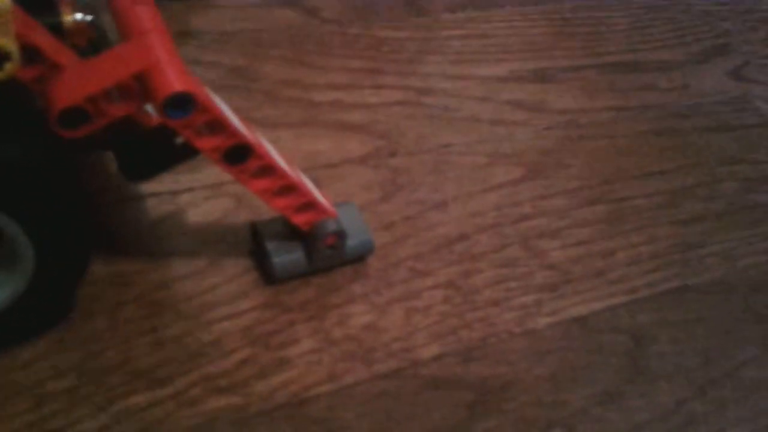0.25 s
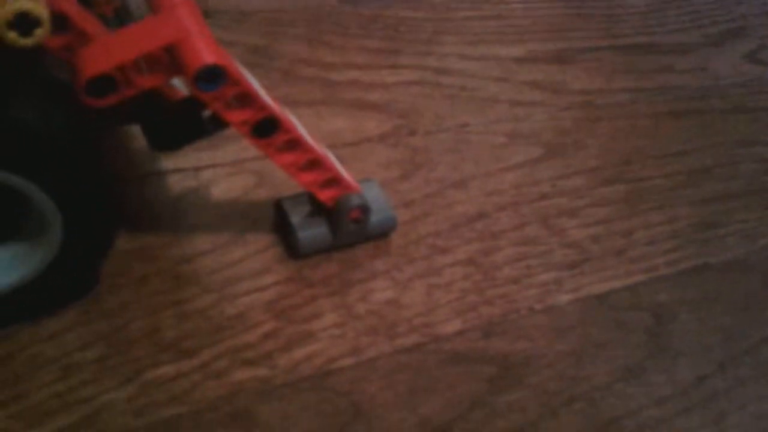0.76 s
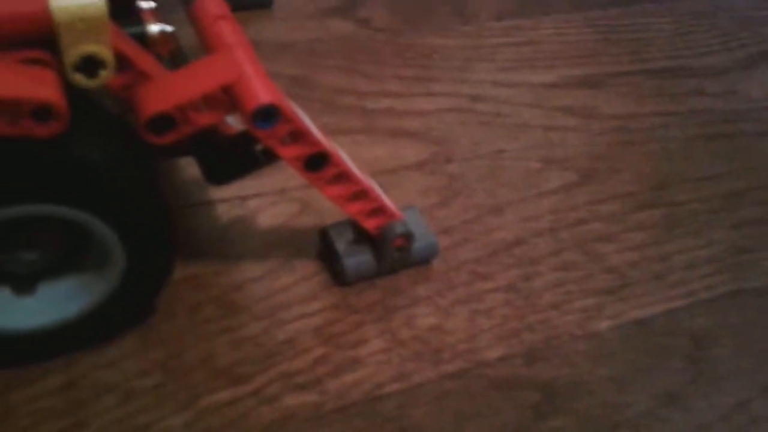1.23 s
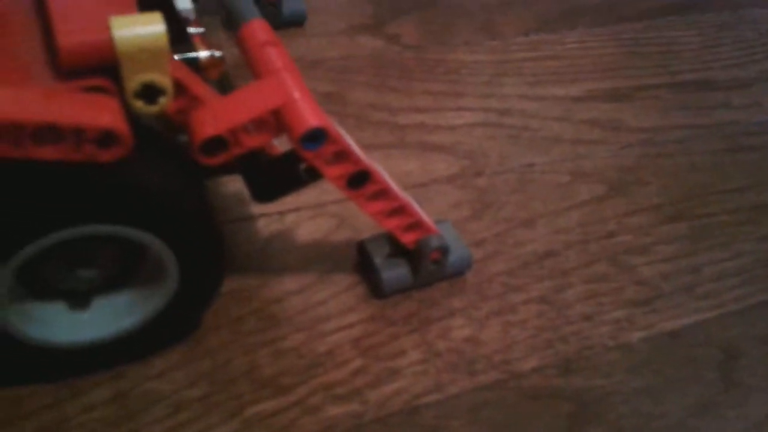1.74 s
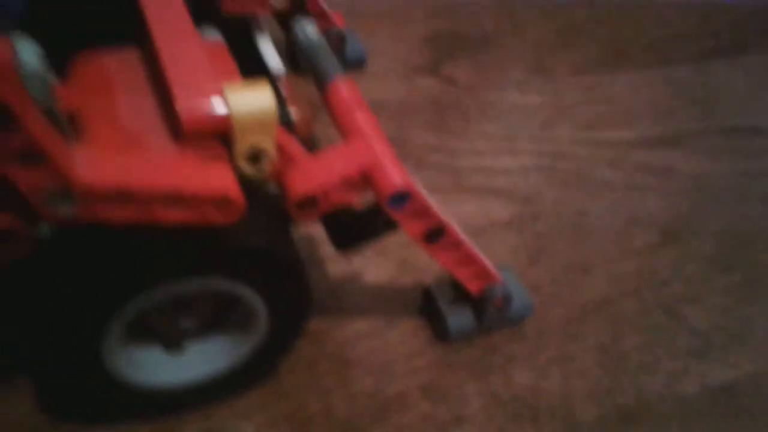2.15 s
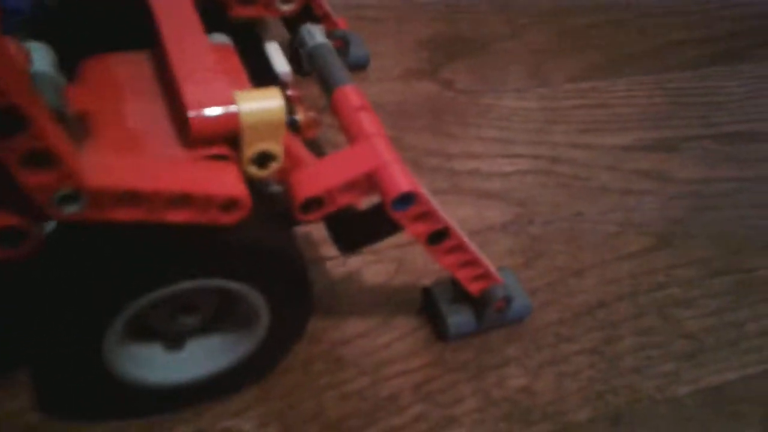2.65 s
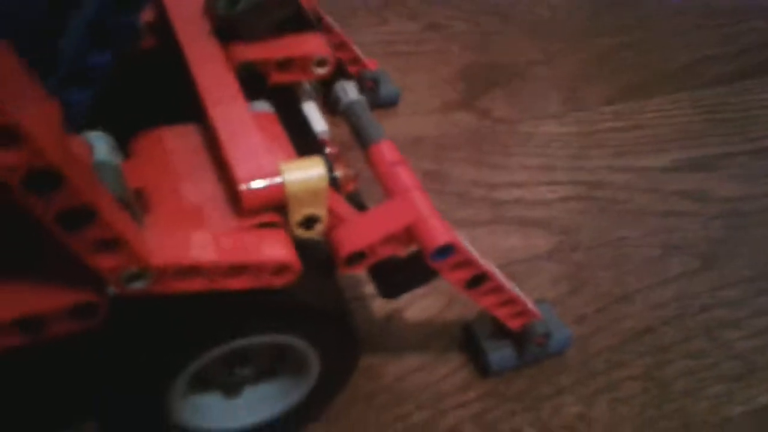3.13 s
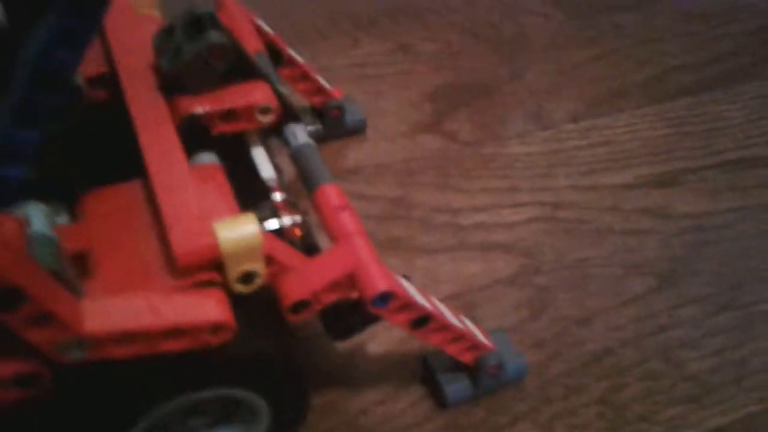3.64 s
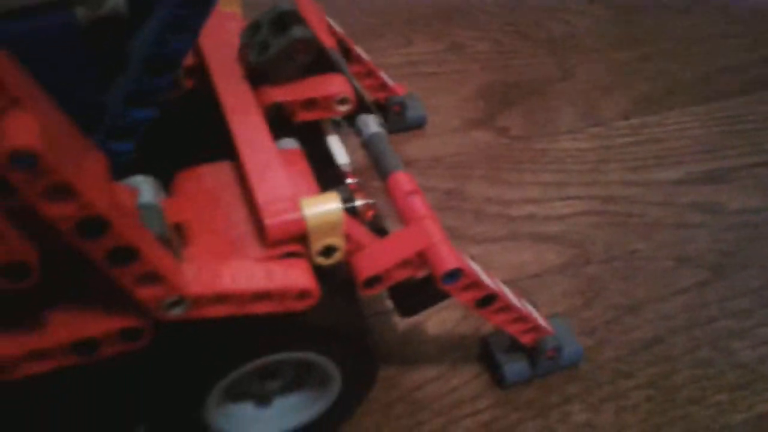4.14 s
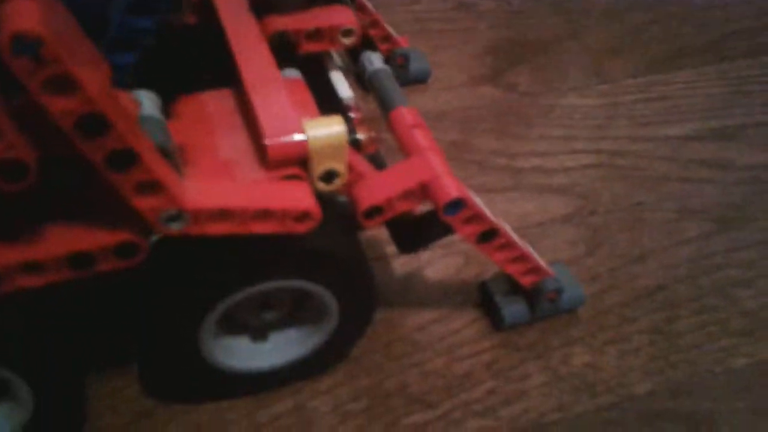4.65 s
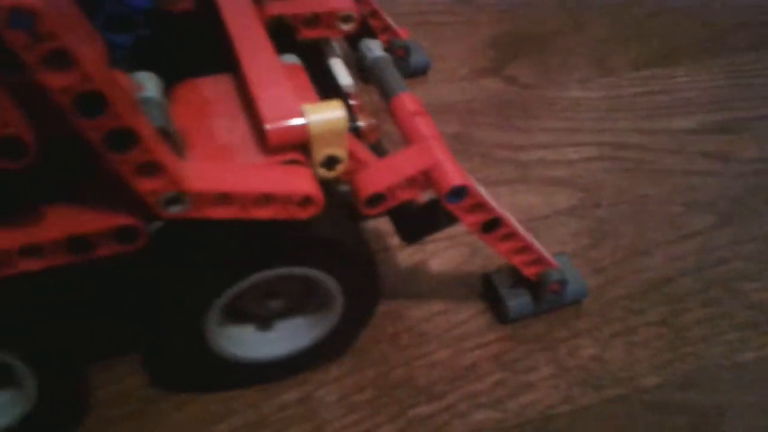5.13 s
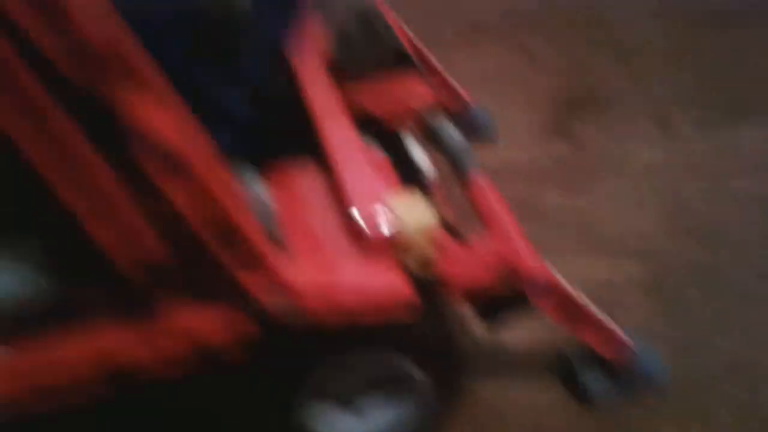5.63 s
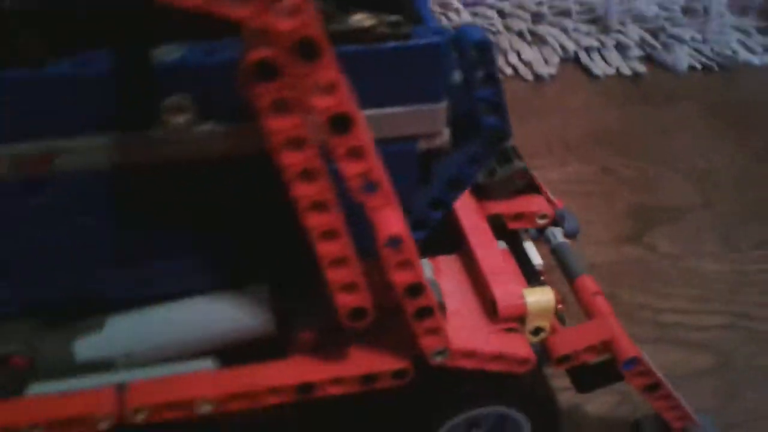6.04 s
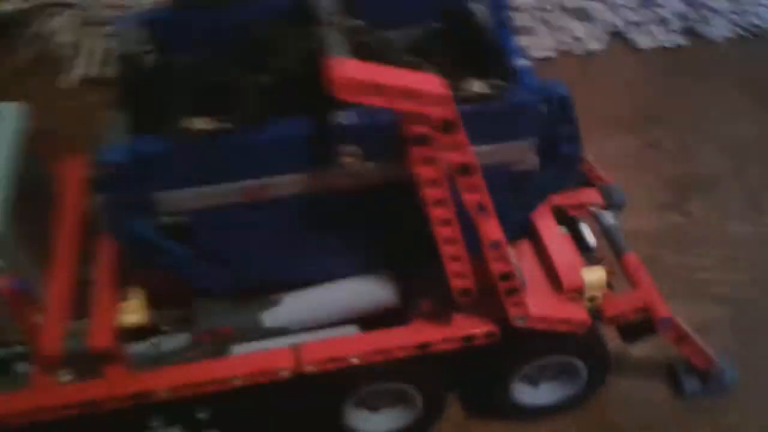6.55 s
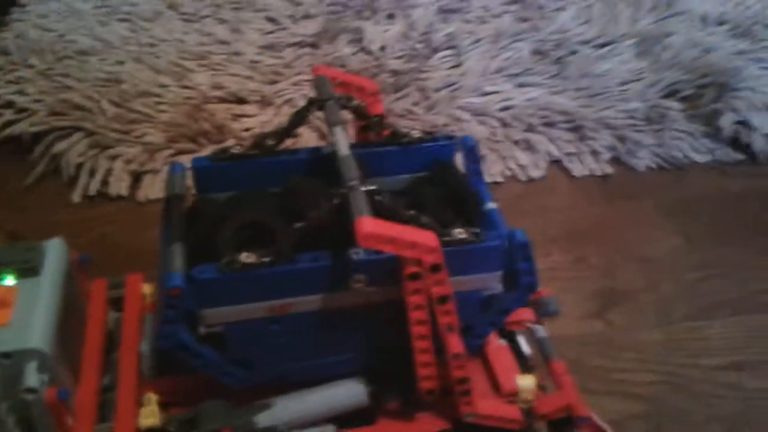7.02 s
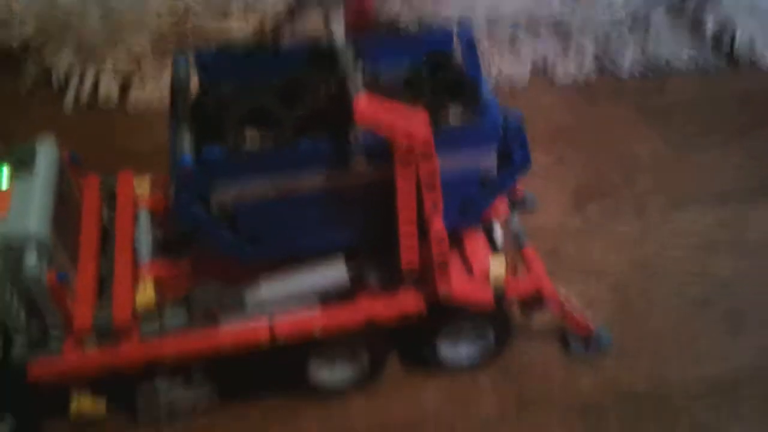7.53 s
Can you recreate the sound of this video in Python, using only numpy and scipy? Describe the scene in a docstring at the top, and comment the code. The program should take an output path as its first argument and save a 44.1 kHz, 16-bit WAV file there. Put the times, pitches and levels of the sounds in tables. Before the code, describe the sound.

Close grinding buzz of a toy truck's motor stops, plastic levers snap in near silence, then the gears whir again and gradually strain.

```python
"""Geared motor in a toy truck.

A small electric motor in a plastic truck on a wooden floor, heard close in mono. It runs and coasts down,
levers click and a part is nudged, then it runs in reverse and slows under load as the camera backs off.
Gears are pulsed noise and knocks coloured by the housing; shaft orders, pinion mesh and whine are sines
locked to shaft angle; clicks are noise bursts through resonances; handling and background are shaped noise.
"""
import sys
import numpy as np
from scipy import signal
from scipy.fft import rfft, irfft, next_fast_len
from scipy.io import wavfile
from scipy.ndimage import uniform_filter1d, map_coordinates

SR = 44100
rng = np.random.default_rng(int(sys.argv[2]) if len(sys.argv) > 2 else 0)


def persist_wave(psi):
    """Save psi, clipped to +-1, as 16-bit WAV."""
    counts = np.round(np.clip(psi, -1, 1) * 32767).astype(np.int16)
    wavfile.write(sys.argv[1], SR, np.atleast_2d(counts).T)


N = 343098
TIME_S = np.arange(N) / SR
TOP_HZ = 15730
PINION_TEETH = 9
STOP_S, COAST_S, START_S, SPIN_UP_S = 1.48, .22, 3.7, .3

# Shaft, forward then reverse under load: start_s, speed_hz (before coast and spin-up), mesh_tone_db (before trim)
SHAFT = [(0, 150, -73), (.62, 150.1, -72), (.75, 147.6, -67), (.98, 147, -68), (1.06, 144, -65),
         (1.14, 149, -71), (1.22, 149, -72), (1.28, 146, -73), (1.54, 146.5, -75), (3.96, 149, -63),
         (4.2, 152.1, -61), (4.45, 152.1, -61), (4.55, 151.1, -58), (4.72, 151.5, -59), (5.05, 149.1, -58),
         (5.2, 148.8, -57), (5.42, 146.7, -55), (5.5, 145.2, -55), (5.68, 144.3, -55), (5.88, 141.7, -57),
         (6.05, 138.8, -59), (6.2, 138.7, -61), (6.33, 135.5, -62), (6.59, 132.3, -70), (6.72, 132.7, -70),
         (6.88, 131.3, -75), (7.13, 133.8, -74), (7.37, 137.7, -73), (7.78, 140.2, -70)]
# View heard, 0 forward, 1 reverse near, 2 backing off, 3 reverse far: start_s, view_0_to_3
VIEW = [(3, 0), (3.8, 1), (5.5, 1), (6.0, 2), (6.5, 2), (6.95, 3)]
# Gear noise, one list forward, one reverse: start_s, level_db (before treble and bass lift)
GEAR_LEVEL = [
    [(0, -38.5), (.4, -36), (.7, -37.3), (1.0, -35.5), (1.3, -38), (1.45, -35), (1.52, -39), (1.59, -46),
     (1.62, -52), (1.67, -75), (1.75, -95)],
    [(3.76, -59), (3.78, -49), (3.83, -40), (3.88, -40.5), (3.93, -34), (3.97, -34.5), (4.02, -39),
     (4.2, -41.5), (4.5, -38), (5.1, -37), (5.8, -35.3), (6.3, -36.6), (7.05, -38), (7.78, -41.5)],
]
# Housing colour, one list per view: freq_hz, relative_db_per_hz
HOUSING = [
    [(100, -14), (500, -12), (1400, -12), (1900, -8.5), (3800, 4.5), (4600, 5.5), (5800, 3), (7400, -9.5),
     (8200, -12), (10500, -12.5), (11300, -8), (13000, -9.5), (15700, -14.5)],
    [(100, -21), (500, -18), (1400, -16), (2000, -6.5), (3800, -4), (5500, -6.5), (7000, -9.5),
     (9000, -12.5), (9700, -15), (11200, -12.5), (12000, -9), (13300, -20), (14000, -12), (15700, -31)],
    [(100, -19.5), (700, -21), (1250, -14), (1600, -18.5), (2100, -8), (3600, -4.5), (4300, -3.5),
     (5000, -1), (7000, -3), (8000, -18), (9500, -15.5), (12200, -11), (13500, -16), (15700, -18)],
    [(100, -16.5), (700, -16), (1150, -16.5), (1500, -20), (2100, -7), (3600, -4.5), (4300, -2),
     (5200, -3.5), (6500, -1.5), (7500, -10), (9500, -18.5), (12000, -12.5), (14000, -18.5), (15700, -16)],
]
# Frame hollows and panels: centre_hz, width_hz, forward_db, reverse_db
PANELS = [(1160, 450, 4.5, 4), (1860, 150, 8, 1.5), (2410, 600, 8, 2), (3830, 120, 2, 5),
          (4370, 110, -8.5, -0.5), (4680, 83, -9.5, 3), (6830, 300, 1.5, 2.5), (8370, 300, 3.5, 4),
          (8800, 1200, 10.5, 3), (10430, 180, 8, 0.5), (11900, 130, -5, 3), (13000, 100, -2, 4.5)]
# Floor reflection whose bright band glides, mostly upward, as the camera moves: start_s, centre_hz, lift_db
GLIDE = [(5.6, 5000, 0), (6.35, 4820, 6), (6.55, 5700, 6), (7.1, 5700, 5), (7.2, 6360, 5), (7.6, 6380, 0)]
# Gear treble lift, one value per view: lift_db
TREBLE_DB = [4.3, 2, 1.2, 2.5]
# Gear bass lift, one value per view: lift_db
BASS_DB = [1, -.7, .5, -.8]
SLOW_TREBLE_DB, SLOW_BASS_DB = -6, 14  # scale of the added lift as the shaft slows
# Shaft orders: multiple, forward_db, reverse_near_db, reverse_far_db (before trim)
SHAFT_ORDERS = [(3, -71, -72, -82), (4, -68, -72, -82), (6, -67, -66, -77), (7, -71, -67, -82),
                (8, -69, -74, -69), (10, -67, -64, -70), (11, -63, -67, -82), (12, -62, -63, -82),
                (13, -60, -58, -71), (14, -72, -66, -69), (15, -62, -61, -65), (16, -64, -67, -69),
                (17, -60, -58, -82), (18, -64, -82, -69), (19, -82, -65, -82), (20, -82, -63, -82),
                (21, -66, -66, -68), (24, -62, -82, -76), (30, -64, -68, -82), (33, -82, -64, -82),
                (36, -65, -64, -73), (39, -82, -71, -69), (42, -70, -82, -62), (45, -68, -71, -82),
                (48, -69, -62, -75), (51, -82, -61, -82), (54, -64, -67, -82), (57, -82, -68, -82),
                (60, -64, -70, -73), (63, -73, -67, -82), (66, -67, -66, -75), (69, -76, -58, -82),
                (72, -77, -65, -82), (75, -72, -66, -72), (78, -71, -59, -75), (81, -74, -58, -72),
                (84, -82, -60, -75), (87, -77, -55, -66), (90, -67, -62, -68), (93, -64, -65, -71),
                (96, -77, -65, -71), (99, -82, -65, -76), (102, -65, -69, -82), (105, -76, -67, -77)]
# Whine frequency over shaft speed: forward_ratio, reverse_ratio
WHINE_RATIO = [33, 26.25]
# Gear whine, swelling as teeth bind: start_s, level_db
WHINE = [(0, -48), (.08, -43.5), (.66, -44), (.74, -53), (.92, -54), (1.06, -63), (1.16, -46), (1.24, -47),
         (1.29, -60), (1.5, -60), (1.56, -72), (5.18, -72), (5.5, -46), (5.72, -45), (5.84, -37),
         (6.05, -50), (6.16, -47), (6.3, -39), (6.5, -46), (6.61, -44), (6.64, -62), (6.73, -62),
         (6.75, -47), (7.13, -46.5), (7.35, -52), (7.52, -59), (7.66, -49), (7.78, -66)]
# Low rumble, stronger while the motor rests: start_s, level_db
RUMBLE_LEVEL = [(0, -90), (1.1, -92), (1.145, -64), (1.2, -86), (1.55, -90), (1.65, -65), (1.78, -76),
                (1.88, -66), (2.06, -77), (2.55, -77), (2.85, -69), (3.15, -75), (3.31, -64), (3.68, -83),
                (3.76, -72), (4.05, -83), (5.5, -86), (6.0, -79), (7.78, -78)]
# Rumble colour: freq_hz, relative_db_per_hz
RUMBLE_COLOUR = [(12, -41), (20, -12.5), (43, -5.5), (77, -2), (119, -7), (400, -28.5), (520, -64.5),
                 (880, -120)]
# Scale of the slow rumble swing: at_rest_db, running_db
RUMBLE_SWING_DB = [2.5, 6.5]
# Faint steady-pitched room tone: freq_hz, level_db (before trim)
HUM = (555, -88)
# Microphone hiss colour: freq_hz, relative_db_per_hz (before low cut)
HISS_COLOUR = [(88, -29), (150, 0.5), (172, -10.5), (205, -8), (740, -20), (1610, -23), (1780, -25.5),
               (15700, -33.5)]
# Plastic clicks: start_s, burst_peak_db, bright_db, rise_ms, t60_ms, knock_hz, knock_db, thud_db
CLICKS = [(1.142, -2, -0.6, 1.08, 8, 6270, 1.5, -21.5), (1.7882, -46, -11, 0.93, 40, 3180, -4, -5),
          (1.806, -47, -15.8, 3.4, 35, 3660, -2, -12), (1.832, -47, -13, 1.7, 32, 3080, 0, -22),
          (1.842, -37, -8.5, 2.1, 14, 2810, 2, -11), (2.076, -59, -6, .7, 12, 3400, 3, -17),
          (2.657, -48, -1.8, 4.6, 12, 2504, -3, -14), (2.68, -54, -2, 3.3, 19, 3900, -4, -35),
          (2.7102, -55, -13, 2.1, 30, 1560, -3, -5), (2.7345, -23.5, -0.9, 6.5, 16, 5450, -10, -21),
          (2.7614, -28, -4, 4.1, 36, 6140, -6, -14), (2.7905, -17, -5, 1.02, 47, 2750, -4.5, -17),
          (2.9876, -55, -2.5, 1.6, 23, 1563, 1, -13), (3.048, -41, -11, 2.26, 14, 2320, 6, -20),
          (3.1925, -28, -4.5, 5.6, 34, 2450, -12, -16), (3.2591, -36.5, -1.7, 0.7, 11, 2340, -4, -15),
          (3.3324, -54, -12, 3, 50, 2640, 0, -9), (3.3655, -45, -10, 1.9, 7, 2680, 5, -13),
          (3.4676, -55.5, -3.5, 0.46, 6, 3290, -2, -34), (3.7272, -41.5, -20.5, 4.2, 93, 2930, -5, -16),
          (3.7567, -39.5, -12, 1.5, 10, 2370, -8, -17), (3.7797, -36, -14, 4.7, 33, 4400, -5, -28),
          (3.7935, -28, -14, 2.8, 8, 2700, -5, -23), (3.8091, -8.5, -14.5, 0.55, 14, 5600, -1.5, -40),
          (3.891, -29, -9, 1, 13, 3800, -2, -27), (3.9606, -17.2, -5, 2.0, 30, 4440, -7, -26),
          (3.9793, -16, -3.5, 3, 30, 3550, -14, -19), (3.9851, -15.5, -4.3, 0.78, 20, 3440, -11, -21),
          (4.091, -27, -12, 1.24, 13, 2970, 14, -33)]
# Dull click modes: centre_hz, width_hz, gain_db
DULL_MODES = [(1492, 440, -5), (2585, 690, -1), (3500, 1300, -1.5), (5600, 1400, -5.5)]
# Bright click modes: centre_hz, width_hz, gain_db
BRIGHT_MODES = [(6260, 1900, 1), (8200, 470, 1), (9540, 660, -0.5), (13600, 1800, -7)]
# Floor thud modes: centre_hz, width_hz, gain_db
THUD_MODES = [(420, 250, -9), (860, 120, 0), (1400, 140, -3)]
# Room decay: freq_hz, t60_s
ROOM = [(300, 0.65), (3000, 0.32), (8000, 0.25), (15000, 0.073)]
# Room tail against burst: at_rest_db, running_db
TAIL_DB = [-8.5, -12]
# Faint handling of the truck: start_s, body_db, air_db
RUSTLE = [(1.6, -76, -75), (1.89, -82, -80.5), (2.55, -76, -82), (2.75, -77, -77), (2.84, -55, -71),
          (2.9, -79, -74), (3.37, -82, -76), (3.55, -90, -85), (3.8, -88, -82)]
# Handled body modes, applied twice: centre_hz, width_hz, gain_db (per pass)
HANDLED_MODES = [(2040, 330, 0), (2680, 270, 4), (3310, 820, 0.5), (5340, 1500, -2.5)]
# Airy part of the rustle: freq_hz, relative_db_per_hz
AIR_COLOUR = [(3000, -28), (6000, -1.5), (9000, 0), (15700, -4)]
# Something brushes past: peak_s, peak_db, rise_ms, fall_ms
SWISH = (2.175, -50, 76, 100)
# Swish colour: freq_hz, relative_db_per_hz
SWISH_COLOUR = [(250, -34), (500, -14.5), (1000, -17.5), (1800, -18.5), (2600, -5), (3000, -1),
                (4000, -0.5), (4800, -9.5), (7200, -6), (8500, -8.5), (9700, -10.5), (10500, -15),
                (13500, -19), (15700, -25.5)]
# A gear squeaks as it catches: peak_s, peak_db, rise_ms, fall_ms
SQUEAK = (3.925, -37, 60, 32)


def amp(db):
    """Gain of a level in dB."""
    return np.exp(np.asarray(db) * (np.log(10) / 20))


def unit(x):
    """Scaled to rms 1."""
    return x / np.sqrt(np.mean(x ** 2) + 1e-20)


def along(points, hz):
    """Values of (Hz, value) points, interpolated on a log axis."""
    f, v = np.transpose(points)
    return np.interp(np.log(hz + 1), np.log(f + 1), v)


def curves(rows):
    """One value per sample for each column after the time."""
    s, *cols = np.transpose(rows)
    return [np.interp(TIME_S, s, c) for c in cols]


def wobble(rate_hz):
    """Random curve, rate_hz spline knots a second, held for 16 samples."""
    step = 16
    knots = rng.standard_normal(int(N * rate_hz / SR) + 4)
    return np.repeat(map_coordinates(knots, [TIME_S[::step] * rate_hz]), step)[:N]


def patches(shape, bins, frames):
    """Random field over frequency and time, rms 1."""
    field = uniform_filter1d(rng.standard_normal(shape), bins, 0)
    return unit(uniform_filter1d(field, frames, 1))


def filtered(x, response):
    """x times a response of frequency."""
    m = next_fast_len(x.shape[-1] + 8192)
    return irfft(rfft(x, m) * response(np.fft.rfftfreq(m, 1 / SR)), m)[..., :x.shape[-1]]


def noise(colour):
    """Coloured noise of rms 1."""
    return unit(filtered(rng.standard_normal(N), lambda hz: amp(along(colour, hz))))


def modes(table):
    """Causal response of a few resonances, alternating in sign."""
    def response(f):
        return sum((-1) ** k * amp(db) * 1j * f * w / (c * c - f * f + 1j * f * w)
                   for k, (c, w, db) in enumerate(table))
    return response


def swell(peak_s, db, rise_ms, fall_ms):
    """Rounded swell, 60 dB down at the given rise and fall times."""
    u = (TIME_S - peak_s) * 1000 / np.where(TIME_S < peak_s, rise_ms, fall_ms)
    return amp(db - 60 * np.minimum(u ** 2, 4))


def turning():
    """Share of full speed: the shaft coasts down to a tenth and spins up at the restart."""
    coast = 1 - (TIME_S - STOP_S) / COAST_S
    spin_up = (TIME_S - START_S) / SPIN_UP_S
    return np.clip(np.maximum(coast, spin_up), .1, 1)


def speed():
    """Shaft speed in Hz, slightly unsteady."""
    return curves(SHAFT)[0] * turning() * (1 + .0008 * wobble(60))


def views():
    """Share of each view in what is heard."""
    view = curves(VIEW)[0]
    return np.array([np.clip(1 - abs(view - k), 0, 1) for k in range(len(HOUSING))])


def powered():
    """Gate of the shaft-locked tones, closed while the motor rests."""
    return np.clip((1.52 - TIME_S) / 0.12, 0, 1) + np.clip((TIME_S - 3.98) / 0.1, 0, 1)


def gear_drive(shaft_hz, angle, forward):
    """Teeth scrape and knock at random, 6.1 knocks a turn on average, pulsing with each turn."""
    struck_now = rng.random(N) < 6.1 * shaft_hz / SR
    knocks = struck_now * amp(3 * rng.standard_normal(N)) * rng.choice([-1, 1], N)
    pulse = 1 + 0.18 * np.cos(angle) + 0.16 * np.cos(2 * angle + 1)
    uneven = amp(0.41 * wobble(25) + .4 * wobble(70))  # uneven meshing of the slower wheels
    coasting = np.where(forward, 150 / shaft_hz, 1)  # single knocks stand out as the shaft runs down
    return pulse * uneven * (rng.standard_normal(N) + .6 * unit(knocks) * coasting)


def surroundings(drive):
    """Broad resonances come and go; nearby surfaces add slow narrow ripples; one floor reflection glides."""
    hz, t, z = signal.stft(drive, SR, nperseg=1024)
    field_db = 0.85 * patches(z.shape, bins=10, frames=6) + 2.5 * patches(z.shape, bins=2, frames=45)
    s, centre_hz, lift_db = np.transpose(GLIDE)
    band = np.exp(-.5 * ((hz[:, None] - np.interp(t, s, centre_hz)) / 170) ** 2)
    field_db += np.interp(t, s, lift_db, 0, 0) * band
    return signal.istft(z * amp(field_db), nperseg=1024)[1][:N]


def housing(drive, share):
    """The housing colours the drive differently in each view; panels resonate by running direction."""
    out = 0
    for k, colour in enumerate(HOUSING):
        column = 2 if k == 0 else 3  # view 0 is forward, the rest reverse

        def response(f):
            panels_db = sum(p[column] * np.exp(-.5 * ((f - p[0]) / p[1]) ** 2) for p in PANELS)
            return amp(along(colour, f) + panels_db) / (1 + (110 / (f + 1)) ** 8)
        out = out + share[k] * unit(filtered(drive, response))
    return out


def gears(shaft_hz, angle, share):
    """Gear noise through the housing, its treble and bass set by view and shaft speed."""
    drive = surroundings(gear_drive(shaft_hz, angle, share[0] > .5))
    body = housing(drive, share)
    treble = filtered(body, lambda f: 1 / (1 + (7500 / (f + 1)) ** 6))
    bass = filtered(body, lambda f: 1 / (1 + (f / 1500) ** 6))
    slowed = (1 - turning()) ** 2
    treble_db = np.dot(TREBLE_DB, share) + SLOW_TREBLE_DB * slowed
    treble_db = treble_db + 1.4 * share[0] * wobble(28)  # running forward, the treble comes in bursts
    bass_db = np.dot(BASS_DB, share) + SLOW_BASS_DB * slowed
    level_db = curves(np.vstack(GEAR_LEVEL))[0]
    running = (TIME_S < GEAR_LEVEL[0][-1][0]) | (TIME_S > GEAR_LEVEL[1][0][0])
    return running * amp(level_db) * (body + (amp(treble_db) - 1) * treble + (amp(bass_db) - 1) * bass)


def shaft_orders(angle, share):
    """Multiples of shaft speed, unsteady in level and phase, balanced by direction and distance."""
    blend = np.array([share[0], share[1] + share[2] * .5, share[3] + share[2] * .5])
    out = 0
    for multiple, *db in SHAFT_ORDERS:
        level_db = np.dot(db, blend) + 0.2 + 3.0 * wobble(16)
        phase = multiple * angle + 0.72 * wobble(40) + rng.uniform(0, 2 * np.pi)
        out = out + amp(level_db) * np.sin(phase)
    fifth = amp(-73 + 2.2 * wobble(10)) * blend[2] * np.sin(5 * angle)  # shows from afar
    return np.sqrt(2) * powered() * (out + fifth)


def pinion_mesh(angle):
    """Pinion teeth engage at their count times shaft speed."""
    level_db = curves(SHAFT)[1] + 0.4 + 0.87 * wobble(24)
    return np.sqrt(2) * powered() * amp(level_db) * np.sin(PINION_TEETH * angle)


def gear_whine(angle, share):
    """Gear whine, locked to the shaft at one ratio forward, with a third harmonic, and another in reverse."""
    forward = share[0] > .5
    phase = np.where(forward, *WHINE_RATIO) * angle + .4 * wobble(80)
    third = share[0] * amp(-12) * np.sin(3 * phase)
    level_db = curves(WHINE)[0] + np.where(forward, .8, 2.2) * wobble(40)
    return np.sqrt(2) * powered() * amp(level_db) * (np.sin(phase) + third)


def handling_pause():
    """True between the first and last rustle points."""
    return (TIME_S > RUSTLE[0][0]) & (TIME_S < RUSTLE[-1][0])


def rumble():
    """Low noise with a slow random swing."""
    swing_db = np.where(handling_pause(), *RUMBLE_SWING_DB) * wobble(6)
    return amp(curves(RUMBLE_LEVEL)[0] + swing_db) * noise(RUMBLE_COLOUR)


def hum():
    """Faint sine of steady pitch and wavering level."""
    freq_hz, level_db = HUM
    return amp(level_db - 1.5 + 2.5 * wobble(6)) * np.sqrt(2) * np.sin(2 * np.pi * freq_hz * TIME_S)


def hiss():
    """Steady microphone noise with a low cut."""
    return amp(-74) * filtered(noise(HISS_COLOUR), lambda f: 1 / (1 + (120 / (f + 1)) ** 6))


def struck(burst, bright_db, knock_hz, knock_db, thud_db):
    """Noise through the frame's modes, the struck part's own pitch and the floor."""
    def dull_response(f):
        return modes(DULL_MODES)(f) * (1j * f / (1100 + 1j * f)) ** 2 / (1 + 1j * f / 6000)
    part = modes([(knock_hz, .16 * knock_hz, 0)])
    dull = unit(filtered(burst[0], dull_response))
    knock = unit(filtered(burst[1], lambda f: part(f) ** 2))
    thud = unit(filtered(burst[1], lambda f: modes(THUD_MODES)(f) / (1 + 1j * f / 1200)))
    bright = unit(filtered(burst[2], modes(BRIGHT_MODES)))
    share = np.clip(amp(bright_db), 0, .98)
    body = unit(dull + amp(knock_db) * knock)
    return np.sqrt(1 - share ** 2) * body + share * bright + amp(thud_db) * thud


def room_tail():
    """Fresh noise tail of energy 1; each frequency dies at its own speed."""
    hz, t, z = signal.stft(rng.standard_normal(SR // 3), SR, nperseg=256)
    decay = amp(-60 * t / along(ROOM, hz)[:, None])
    tail = signal.istft(z * decay, SR, nperseg=256)[1][:SR // 3]
    return tail / np.linalg.norm(tail)


def clicks():
    """Each contact is a short burst, an echo 6.2 ms on, and a similarly coloured room tail."""
    out, ms = np.zeros(N + SR), np.arange(SR // 10) / SR * 1000
    for s, db, bright_db, rise_ms, t60_ms, knock_hz, knock_db, thud_db in CLICKS:
        rise = np.minimum(ms / max(rise_ms, .1), 1) ** 2
        shape = rise * amp(-60 * np.maximum(ms - rise_ms, 0) / max(t60_ms, 3))
        hit = struck(shape * rng.standard_normal((3, len(ms))), bright_db, knock_hz, knock_db, thud_db)
        hit = amp(db) * hit / abs(hit).max()
        softened = filtered(hit, lambda f: 1 / (1 + 1j * f / 9000))
        echo = np.pad(softened, (round(.0062 * SR), 0))[:len(ms)]
        # the room blurs the pitch
        wet = struck([room_tail()] * 3, bright_db - 3, knock_hz, knock_db - 9, thud_db)
        tail_db = TAIL_DB[0] if STOP_S < s < START_S else TAIL_DB[1]
        wet *= amp(tail_db) * np.linalg.norm(hit) / np.linalg.norm(wet)
        wet *= np.clip(np.arange(len(wet)) / SR / 0.0027, 0, 1)  # the room fades in over 2.7 ms
        out[round(s * SR):][:len(ms)] += hit + amp(-11) * echo
        out[round((s + rise_ms / 1000) * SR):][:len(wet)] += wet
    return out[:N]


def rustle():
    """Handling: wavering noise through the body's modes, plus airy noise."""
    body_db, air_db = curves(RUSTLE)
    body = unit(filtered(rng.standard_normal(N), lambda f: modes(HANDLED_MODES)(f) ** 2))
    body = amp(body_db + 1.5 * wobble(60)) * body
    return handling_pause() * (amp(air_db) * noise(AIR_COLOUR) + body)


def swish():
    """Brushing friction: one swell of coloured noise."""
    return swell(*SWISH) * amp(1.3 * wobble(100)) * noise(SWISH_COLOUR)


def squeak():
    """A catching gear squeaks: one swell of an unsteady 3680 Hz sine."""
    phase = 2 * np.pi * 3680 * TIME_S + 1.6 * wobble(200)
    return np.sqrt(2) * swell(*SQUEAK) * amp(3.2 * wobble(150)) * np.sin(phase)


def scene():
    """All sources on one microphone, alike on both channels."""
    shaft_hz, share = speed(), views()
    angle = 2 * np.pi * np.cumsum(shaft_hz) / SR
    motor = gears(shaft_hz, angle, share) + shaft_orders(angle, share)
    motor = motor + pinion_mesh(angle) + gear_whine(angle, share)
    background = rumble() + hum() + hiss()
    mono = motor + background + clicks() + rustle() + swish() + squeak()
    return np.array([mono, mono])


def record(dry):
    """The camera keeps nothing above its band limit, an 80 Hz wide slope."""
    return filtered(dry, lambda hz: np.clip((TOP_HZ + 40 - hz) / 80, 0, 1) ** 3)


dry = scene()
out = record(dry)
persist_wave(out)
```